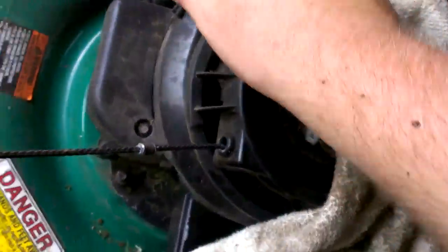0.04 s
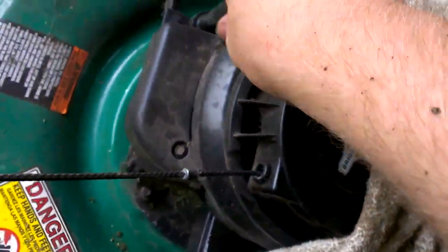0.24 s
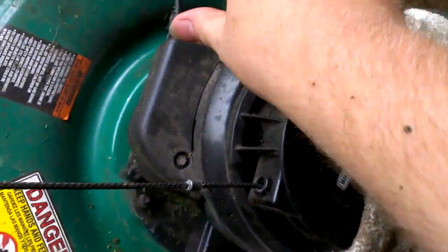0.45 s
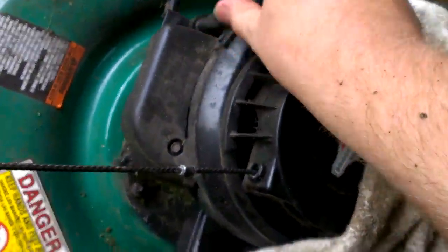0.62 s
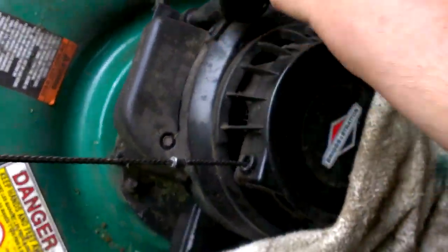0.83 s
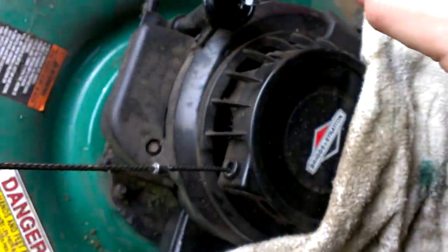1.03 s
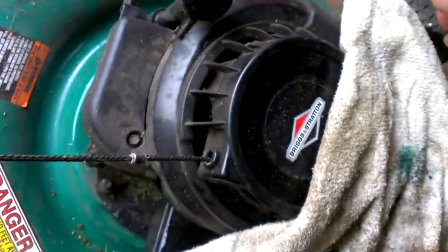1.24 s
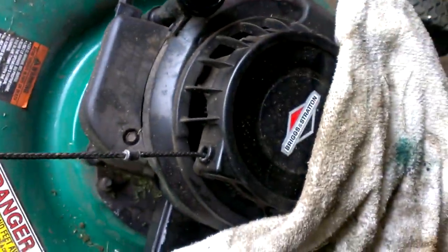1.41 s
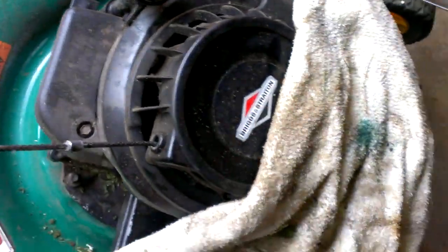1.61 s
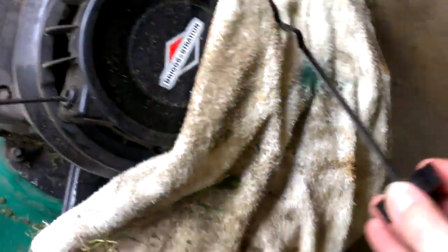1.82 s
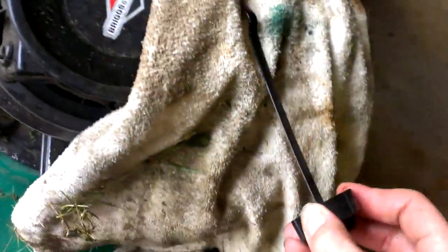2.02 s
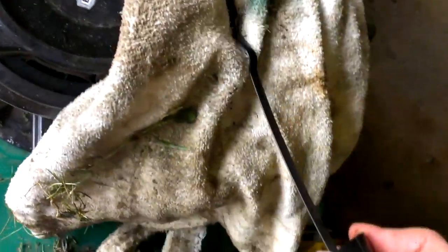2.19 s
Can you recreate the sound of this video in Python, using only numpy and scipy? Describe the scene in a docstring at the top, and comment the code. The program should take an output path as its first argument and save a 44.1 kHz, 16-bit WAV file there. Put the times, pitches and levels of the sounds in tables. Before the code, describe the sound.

A plastic oil cap twists off a lawnmower engine close by, with gritty scraping, sharp snaps and hollow knocks from 0.2 to 0.7 seconds, loudest near 0.3. The dipstick clicks and rattles briefly around 0.85, then slides very faintly along its tube from 1 to 1.5. A rag rustles softly around 1 and 2.2 seconds. Faint, scattered bird chirps sit over a quiet outdoor rumble.

```python
"""Drawing a lawnmower's dipstick

A plastic oil cap is twisted off close by. Stick-slip friction and sudden snaps in the filler neck
excite the modes of the cap and the engine housing; the dipstick blade chatters, then rubs along its tube.
Small birds chirp over a quiet outdoor rumble, and a rag rustles at the end."""
import sys
import numpy as np
from scipy import signal
from scipy.fft import rfft, irfft
from scipy.io import wavfile

SR = 44100
rng = np.random.default_rng(int(sys.argv[2]) if len(sys.argv) > 2 else 0)


def waveform_to_disk(signal):
    """Save audio, clipped to [-1, 1], as 16-bit WAV at the path in sys.argv[1]."""
    frames = np.transpose(np.atleast_2d(signal))
    scaled = np.clip(frames, -1, 1) * 32767
    samples = np.round(scaled).astype(np.int16)
    wavfile.write(sys.argv[1], SR, samples)


N = 103635
T = np.arange(N) / SR
BIN_HZ = np.fft.rfftfreq(N, 1 / SR)
SIDES = np.array([[1], [-1]])  # left, right

# Snaps: start_s, tick_db, decay_s, tilt_db_per_octave, bright_hz, rolloff_hz, knock_db, knock_hz
SNAP_EVENTS = [(0.2395, -26, 0.0098, -7.5, 7300, 12100, -36.5, 296),
               (0.2895, -13, 0.0046, 2.5, 9800, 12500, -39, 734),
               (0.2908, -14, 0.017, 3, 6160, 11800, -37, 740),
               (0.3209, -21.5, 0.016, -0.5, 3300, 12400, -35.5, 550),
               (0.3443, -27, 0.011, -32, 3100, 9000, -26.5, 785),
               (0.3483, -28, 0.005, -14, 4380, 9000, -26, 1235),
               (0.3692, -19, 0.0076, 5, 6700, 15500, -50, 1100),
               (0.3845, -21, 0.0041, 5, 14850, 16000, -35, 835),
               (0.3856, -22, 0.019, -10, 4380, 13000, -29, 1906),
               (0.4965, -29, 0.019, 2, 8400, 10500, -31, 1122),
               (0.5110, -29, 0.012, 0, 6050, 10500, -35, 220),
               (0.5427, -31.5, 0.0087, -8, 6300, 9000, -32, 563),
               (0.5552, -25, 0.012, 3, 7200, 11000, -41, 1935),
               (0.5644, -26, 0.009, 4, 6100, 11000, -33, 1264),
               (0.643, -29.5, 0.019, -6, 8350, 11000, -31, 1102),
               (0.6515, -23.5, 0.0095, 5.5, 6000, 13600, -24.5, 1892),
               (0.6757, -28.5, 0.016, 6, 6000, 13600, -34, 293),
               (0.6878, -28.5, 0.0083, 4, 6750, 14000, -41, 478),
               (0.819, -39.5, 0.013, 18, 9600, 13000, -52, 1680),
               (0.8440, -28, 0.038, 4, 6700, 11300, -47.5, 230),
               (0.8655, -34, 0.027, 5.5, 4500, 11400, -47.5, 1090),
               (1.1480, -45.5, 0.014, -1, 5300, 8000, -63, 1224),
               (1.8655, -49.5, .0012, -7, 3600, 6000, -75, 1500)]
# Spectrum of a snap: frequency_hz, density_db
SNAP_SPECTRUM = [(200, -30.5), (1400, -16), (2400, -3), (2800, -21), (3400, -4.5), (3900, -12.5), (4700, 3),
                 (6300, -5.5), (7800, -5.5), (9600, -0.5), (11500, -2.5), (13500, -11), (15500, -7)]
def snaps(attack_s=.0003, crack_s=.0022, ring_db=-4, bright_db=11.5, bright_octaves=0.201):
    """Impact excitation: a crack, then a ring, strongest in a band set by the part that is struck."""
    out = np.zeros((2, N))
    hz = np.maximum(BIN_HZ, 1500)  # no tilt below this
    for start_s, tick_db, decay_s, tilt_db, bright_hz, rolloff_hz, _, _ in SNAP_EVENTS:
        fade = np.hypot(np.exp(-T / crack_s), amp(ring_db) * np.exp(-T / decay_s))
        envelope = amp(tick_db) * np.minimum(T / attack_s, 1) * fade
        peak_db = bright_db * np.exp(-(np.log2(hz / bright_hz) / bright_octaves) ** 2)
        rolloff_db = 10 * np.log10(1 + (hz / rolloff_hz) ** 10)
        tint_db = tilt_db * np.log2(hz) + peak_db + contact_colour() - rolloff_db
        out += delayed(envelope * noise(SNAP_SPECTRUM, NEAR_SPREAD, tint_db), start_s)
    return out


# Fine scraping of grit and blade: time_s, level_db
SCRAPE_LEVELS = [(0.2, -63), (0.25, -40), (0.284, -48), (0.305, -25.5), (0.355, -35), (0.405, -32),
                 (0.432, -50.5), (0.474, -48), (0.505, -38), (0.567, -44.5), (0.605, -43.5), (0.636, -64),
                 (0.66, -38.5), (0.692, -36), (0.705, -55), (0.76, -59), (0.838, -45.5), (0.852, -33),
                 (0.90, -46), (0.945, -48.5), (1.0, -62)]
# Spectrum of one grain: frequency_hz, density_db
GRIT_SPECTRUM = [(200, -35.5), (1400, -11.5), (2400, -6), (2800, -10.5), (3400, -5), (3900, -14),
                 (4700, -8.5), (6300, -3), (7800, -9.5), (9600, -13), (11500, -12), (13500, -22)]
def scrape(contacts=4, decay_s=.004, gain_db=-6.5):
    """Rough-surface friction: every slip at every point of contact releases a short grain of noise."""
    out = np.zeros((2, N))
    for _ in range(contacts):
        grain = unit(noise(GRIT_SPECTRUM, NEAR_SPREAD, contact_colour()) * np.exp(-T / decay_s))
        force = slips(per_s=330, spread_db=6.5) * curve(SCRAPE_LEVELS) * amp(gain_db)
        out += through(force, grain)
    return out


def contact_colour(spacing_hz=190, depth_db=4):
    """Modal coupling: each contact favours its own few plastic resonances, given as dB per bin."""
    position = BIN_HZ / spacing_hz
    count = int(position[-1])
    return depth_db * np.interp(position, np.arange(count), rng.standard_normal(count))


# Modes of the cap: frequency_hz, energy_db, t60_s
CAP_MODES = [(3490, -3.5, .07), (4470, -6, .06), (4990, -4, .08), (6020, -9, .03), (6500, -9, .04),
             (7590, -9, .04), (9690, -5, .03), (9900, -9, .06), (10790, -8, .04), (14850, -2, .03)]
def cap():
    """Resonance: scrapes and snaps radiate directly and also drive the modes of the plastic cap."""
    direct = scrape() + snaps()
    return direct + amp(-7) * through(direct.mean(axis=0), unit(ring(CAP_MODES))) / 2


# Cap grinding in the neck: time_s, level_db, hardness_db (gain above split_hz)
GRIND_LEVELS = [(0.17, -57.5, -11), (0.208, -48.5, -38), (0.227, -37.5, -3.5), (0.295, -33, -22),
                (0.338, -37, -36), (0.36, -32, 9), (0.405, -30.5, -5.5), (0.426, -59.5, -24),
                (0.474, -46, -9), (0.499, -28, -2), (0.53, -35, -5), (0.564, -27.5, -2.5), (0.594, -40, 2),
                (0.632, -36.5, -1.5), (0.684, -32.5, 1), (0.695, -66, -4), (0.79, -60, 9.5),
                (0.858, -45.5, -7.5), (0.91, -54.5, -12)]
def grinding_force(split_hz=948, gain_db=0.5):
    """Contact stiffness: the harder the cap bears on the neck, the more treble its slips carry."""
    pulses = slips(per_s=420, spread_db=5)
    bass = butterworth(pulses, 7, split_hz, "low")
    treble = butterworth(pulses, 7, split_hz, "high")
    rows = np.array(GRIND_LEVELS)
    level, hardness = curve(rows[:, [0, 1]]), curve(rows[:, [0, 2]])
    return (bass + treble * hardness) * level * amp(gain_db)


# Modes of the engine housing: frequency_hz, energy_db, t60_s
HOUSING_MODES = [(224, -2.5, .12), (242, -7, .08), (290, -8, .09), (550, -9, .07), (572, -3.5, .11),
                 (738, -6, .1), (825, -5.5, .09), (878, -8, .1), (1108, -6, .1), (1150, -8, .09),
                 (1247, -6, .1), (1290, -8, .09), (1544, -12, .11), (1924, -2.5, .11)]
# Spectrum of its thud: frequency_hz, density_db
THUD_SPECTRUM = [(40, -33), (100, -6.5), (220, -3), (400, -19.5), (600, 3.5), (760, 3), (1200, 7),
                 (1600, 4.5), (2250, -2), (2800, -23.5), (5000, -4), (16000, -24)]
def housing(thud_decay_s=0.0089, thud_db=-1.5, coupling_db=-6.5, clunk_db=3, clunk_t60_s=0.07):
    """Forced vibration: grinding and snaps ring the housing; each knock adds a hollow note of its own."""
    modes = ring(HOUSING_MODES)
    thud = unit(noise(THUD_SPECTRUM, NEAR_SPREAD) * np.exp(-T / thud_decay_s))
    body = unit(modes + amp(thud_db) * thud)
    force = grinding_force()
    clunks = np.zeros((2, N))
    for start_s, *_, knock_db, knock_hz in SNAP_EVENTS:
        blow = amp(knock_db) * np.sqrt(thud_decay_s * SR / 2)
        force[int(start_s * SR)] += blow * amp(coupling_db)
        clunks += blow * delayed(ring([(knock_hz, clunk_db, clunk_t60_s)]), start_s)
    return through(force, body) + clunks


# Blade chattering in the neck, then rubbing along the tube: time_s, level_db
CHATTER_LEVELS = [(0.76, -72), (0.835, -62), (0.855, -43.5), (0.95, -64.5), (0.98, -78)]
RUB_LEVELS = [(1.0, -67), (1.1, -67.5), (1.33, -64.5), (1.55, -76)]
# Modes of the blade and of its tube: frequency_hz, energy_db, t60_s
BLADE_MODES = [(1695, -4, .15), (2060, -4, .15), (2560, -6, .12), (3540, -3, .2), (4700, -1, .15)]
TUBE_MODES = [(1020, -5, .025), (1230, 0, .02), (2840, -6, .04)]
def dipstick():
    """Intermittent contact rings the loose blade; sliding friction then faintly sounds the hollow tube."""
    chatter = through(slips(per_s=130, spread_db=6.5) * curve(CHATTER_LEVELS), unit(ring(BLADE_MODES)))
    rub = through(slips(per_s=420, spread_db=5) * curve(RUB_LEVELS), unit(ring(TUBE_MODES)))
    return chatter + rub


# Bird notes: start_s, length_s, start_hz, end_hz, warble_ratio, level_db, left_minus_right_db
BIRD_NOTES = [(0.07, 0.062, 5010, 3750, 0.087, -51.5, -4), (0.083, 0.056, 998, 908, 0.13, -55, -2.5),
              (0.111, 0.03, 1610, 1450, 0.078, -61.5, 9), (0.115, 0.043, 3590, 2986, 0.08, -55, -0.5),
              (1.085, 0.071, 4960, 3846, 0.084, -52.5, -4.5), (1.125, 0.05, 3740, 3175, 0.08, -56.5, 0),
              (1.295, 0.034, 3370, 3160, 0.069, -59.5, -5), (1.557, 0.0296, 8600, 8060, 0.05, -54, 6),
              (1.863, 0.073, 4543, 4036, 0.06, -52.5, -7), (1.898, 0.1, 3250, 3653, 0.083, -60.5, -3.5)]
def birds(wavers_per_s=800, t60_s=.55, early_decay_s=.013, tail_db=-11.5):
    """Frequency modulation: gliding tones warble at random, and reflections smear them."""
    out = np.zeros((2, N))
    for start_s, length_s, start_hz, end_hz, warble, level_db, pan_db in BIRD_NOTES:
        progress = np.clip(T / length_s, 0, 1)
        waver = np.interp(T * wavers_per_s, np.arange(200), rng.standard_normal(200))
        hz = (start_hz + (end_hz - start_hz) * progress) * (1 + warble * waver)
        note = np.sqrt(2) * np.sin(2 * np.pi * np.cumsum(hz) / SR) * np.sin(np.pi * progress)
        out += delayed(note * amp(level_db + SIDES * pan_db / 2), start_s)
    reflections = reverberation(t60_s) * (np.exp(-T / early_decay_s) + amp(tail_db))
    return through(out, unit(reflections))


# Rubbing of hand and rag: time_s, level_db
RAG_LEVELS = [(0.03, -91), (0.115, -57.5), (0.18, -72), (0.99, -59.5), (1.27, -63.5), (1.4, -80),
              (1.99, -84.5), (2.22, -61), (2.35, -62)]
# Spectrum of the rubbing: frequency_hz, density_db
RAG_SPECTRUM = [(150, -1.5), (600, 0), (1500, -7), (3500, -9), (8000, -2.5), (11000, -7.5), (15500, -12.5)]
def rag():
    """Friction noise: rubbed cloth gives a soft broadband hiss that swells and fades."""
    return noise(RAG_SPECTRUM, NEAR_SPREAD) * curve(RAG_LEVELS)


# Outdoor background: frequency_hz, density_db
AIR_SPECTRUM = [(45, -25), (80, -12.5), (105, -14), (155, -2), (200, -8.5), (240, -2), (335, -12),
                (476, -13), (580, -17.5), (1040, -18.5), (1560, -22), (2840, -26.5), (8360, -28.5),
                (16000, -30)]
def outdoor_air(level_db=-58):
    """Stationary noise: a diffuse low rumble with a thin hiss."""
    return noise(AIR_SPECTRUM, DIFFUSE_SPREAD, near=False) * amp(level_db)


def reverberation(t60_s):
    """Diffuse field: reflections from the surrounding walls merge into exponentially decaying noise."""
    spectrum = [(100, 12.0), (5000, 8.5), (16000, 1.5)]  # frequency_hz, density_db
    return noise(spectrum, DIFFUSE_SPREAD, near=False) * np.exp(-np.log(1000) * T / t60_s)


# Balance of the two microphone ports: frequency_hz, left_minus_right_db
PORT_BALANCE = [(125, -1.5), (500, 0), (1000, -0.5), (1800, 5), (3000, -5), (5500, 1.5), (9000, 10.5),
                (13000, 2)]
# Stereo width of near and of diffuse sound: frequency_hz, side_minus_mid_db
NEAR_SPREAD = [(150, -26.5), (600, -13.5), (1500, -6.5), (3000, -4.5), (12000, -5.5)]
DIFFUSE_SPREAD = [(30, 9), (70, -7), (160, -21), (500, -8.5), (1500, -1), (12000, -2.5)]
def noise(spectrum, spread, tint_db=0, near=True):
    """Partial coherence: mid and side noise mix to stereo of rms 1; near sound leans to one port."""
    mid, side = rfft(rng.standard_normal((2, N)))
    width = by_hz(spread)
    bins = (mid + SIDES * width * side) / np.sqrt(1 + width ** 2)
    bins = bins * by_hz(spectrum) * amp(tint_db)
    if near:
        bins *= by_hz(PORT_BALANCE) ** (SIDES / 2)
    x = irfft(bins, N)
    return x / x.std()


def ring(modes):
    """Modal superposition: damped sinusoids, each with its own phase and balance at the two ports."""
    t, out = T[:SR // 2], np.zeros((2, N))
    for (hz, energy_db, t60_s), (turn, skew) in zip(modes, rng.uniform(-0.86, 1, (len(modes), 2))):
        k = int(hz * N / SR)  # the mode's frequency bin
        phase = np.pi * turn + 2 * SIDES * skew * by_hz(NEAR_SPREAD)[k]
        wave = np.sin(2 * np.pi * hz * t + phase) * np.exp(-np.log(1000) * t / t60_s)
        out[:, :len(t)] += amp(energy_db) * unit(wave * by_hz(PORT_BALANCE)[k] ** (SIDES / 2))
    return out


def slips(per_s, spread_db):
    """Stick-slip motion: pulses of uneven spacing, size and sign, with steady mean power."""
    gap, size, sign = rng.random((3, 8000))
    at = (np.cumsum(.25 + 1.5 * gap) * SR / per_s).astype(int)
    heights = amp(spread_db * 2.77 * size) * np.sign(sign - .5)
    x = np.zeros(N)
    x[at[at < N]] = heights[at < N]
    return x / x.std()


def amp(db):
    """Decibels to amplitude ratio."""
    return 10 ** (np.asarray(db) / 20)


def curve(rows):
    """Amplitude envelope through (time_s, level_db) points, fading out beyond the ends."""
    time_s, db = np.array(rows).T
    outside_s = np.abs(T - np.clip(T, time_s[0], time_s[-1]))
    return amp(np.interp(T, time_s, db)) * np.exp(-outside_s * 20)


def by_hz(rows):
    """Frequency response: gain per bin through (frequency_hz, level_db) points."""
    hz, db = np.array(rows).T
    return amp(np.interp(np.log(BIN_HZ + 1), np.log(hz), db))


def unit(response):
    """Normalisation to unit energy."""
    return response / np.sqrt(np.mean(np.sum(response ** 2, axis=-1)))


def through(x, response):
    """Convolution with a stereo impulse response."""
    return signal.fftconvolve(np.atleast_2d(x), response[:, :SR], axes=1)[:, :N]


def delayed(x, start_s):
    """Pure time delay."""
    return np.pad(x, ((0, 0), (int(start_s * SR), 0)))[:, :N]


def butterworth(x, order, cutoff_hz, kind):
    """Maximally flat low-pass or high-pass filtering."""
    return signal.sosfilt(signal.butter(order, cutoff_hz, kind, fs=SR, output="sos"), x)


def scene(low_cut_hz=135, reverb_db=-23):
    """Superposition of the nearby engine parts, their faint reverberation and the surroundings."""
    parts = housing() + cap() + dipstick()
    engine = butterworth(parts, 3, low_cut_hz, "high")  # small parts radiate little bass
    reflected = amp(reverb_db) * through(engine, unit(reverberation(t60_s=0.34)))
    return engine + reflected + birds() + rag() + outdoor_air()


def record(dry):
    """Band limiting: a steep low-pass removes the highest treble."""
    cutoff_hz = 15750
    return signal.sosfilt(signal.ellip(10, .2, 70, cutoff_hz, fs=SR, output="sos"), dry)


dry = scene()
out = record(dry)
waveform_to_disk(out)
```